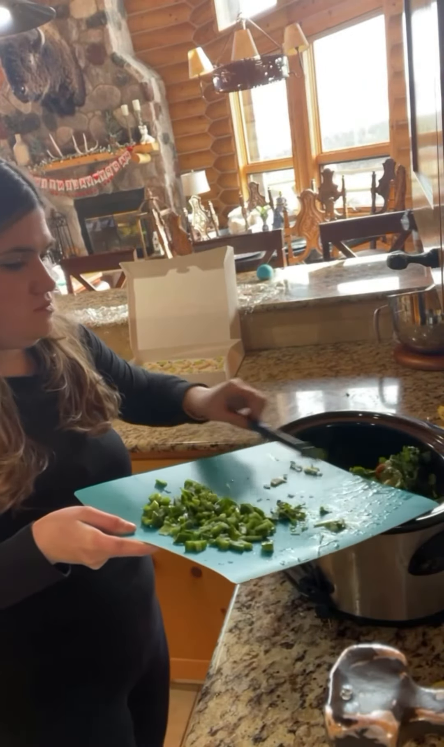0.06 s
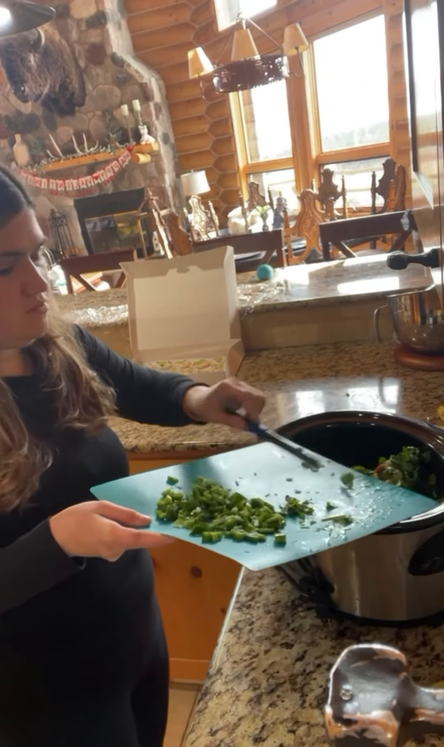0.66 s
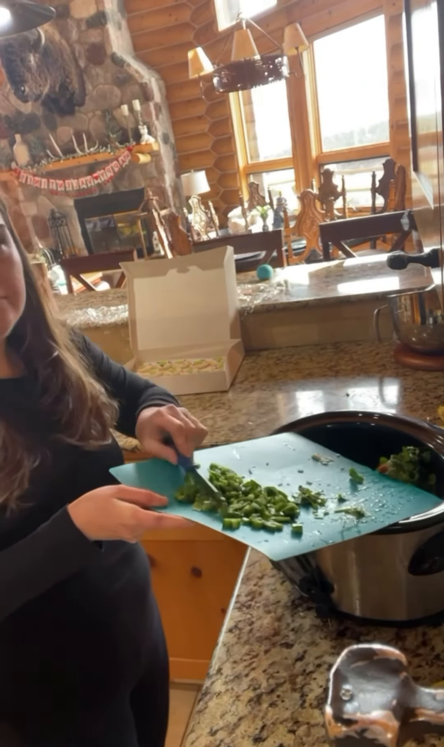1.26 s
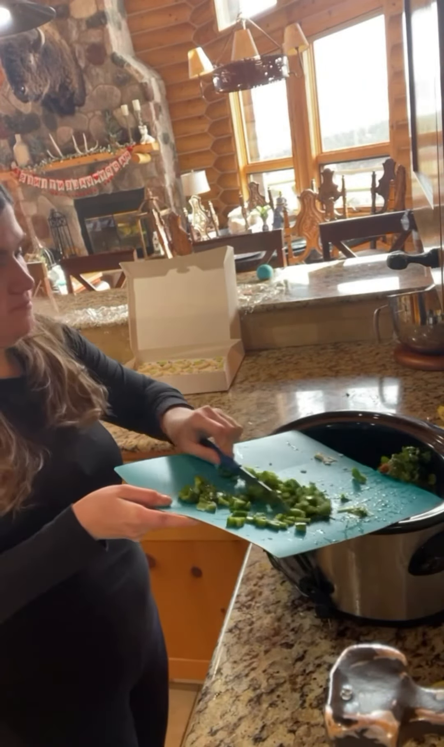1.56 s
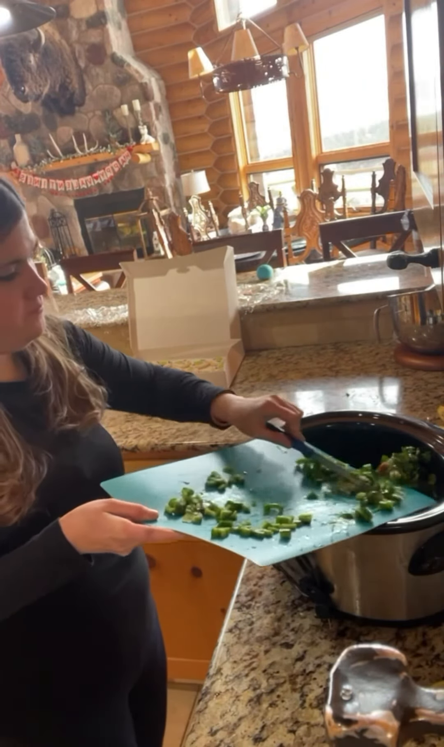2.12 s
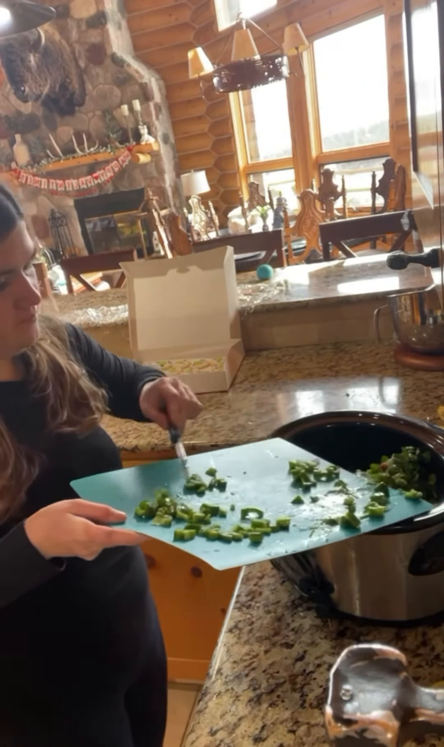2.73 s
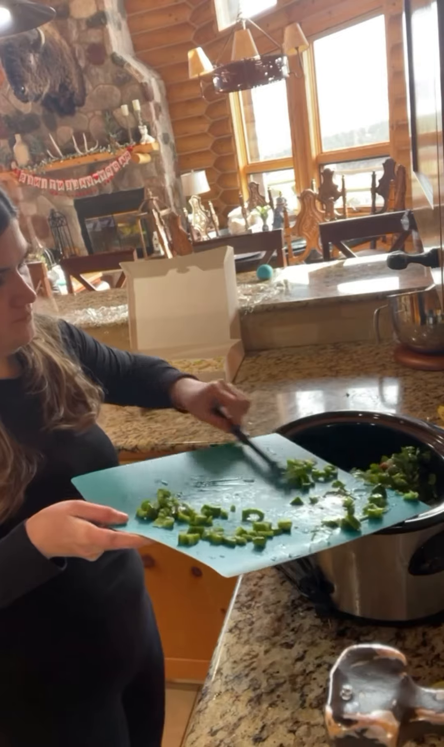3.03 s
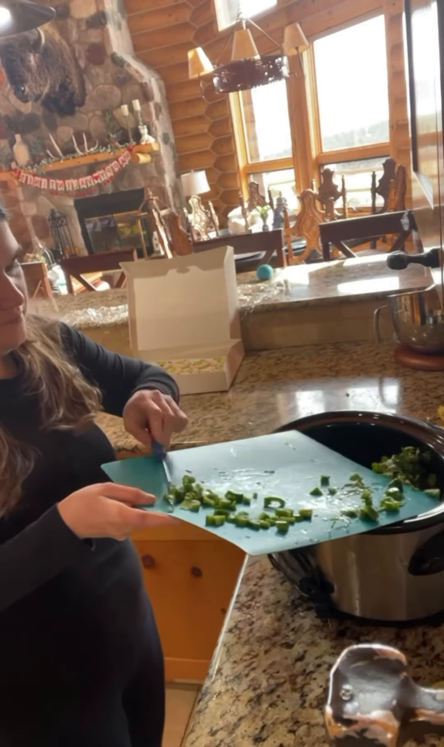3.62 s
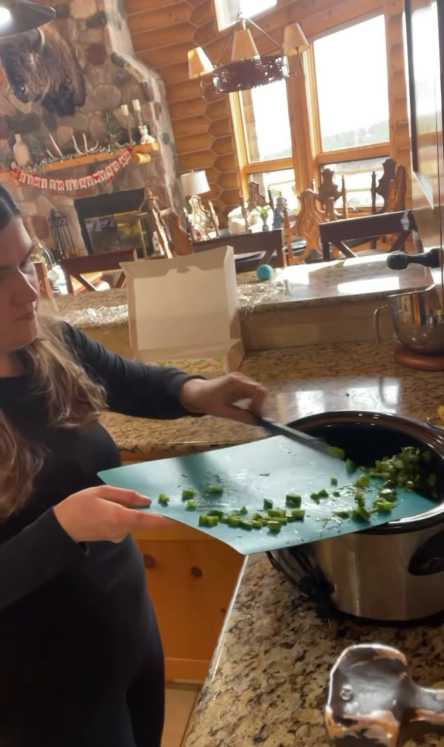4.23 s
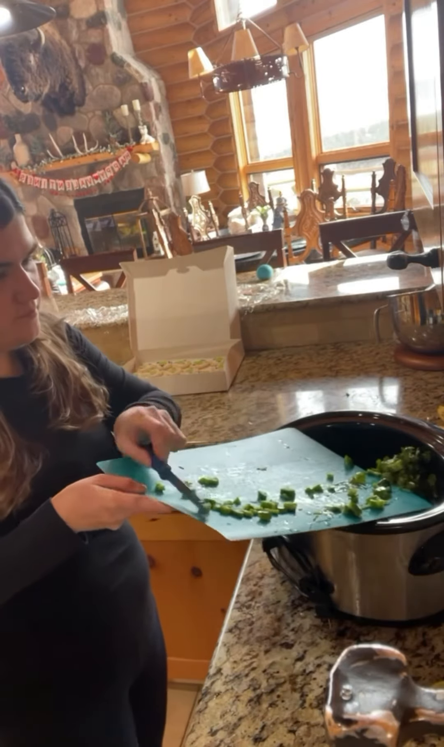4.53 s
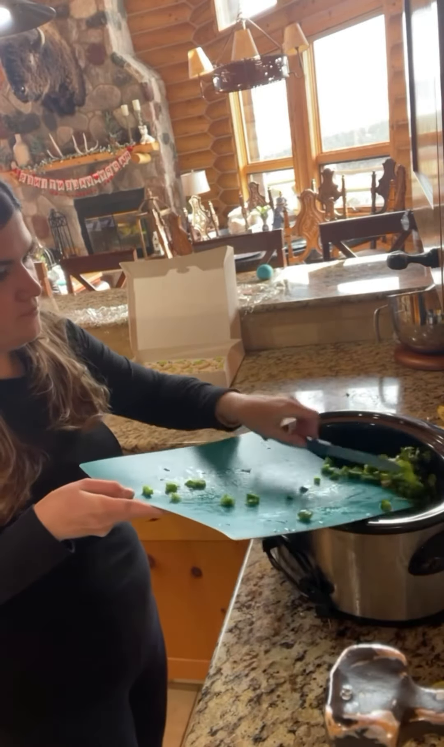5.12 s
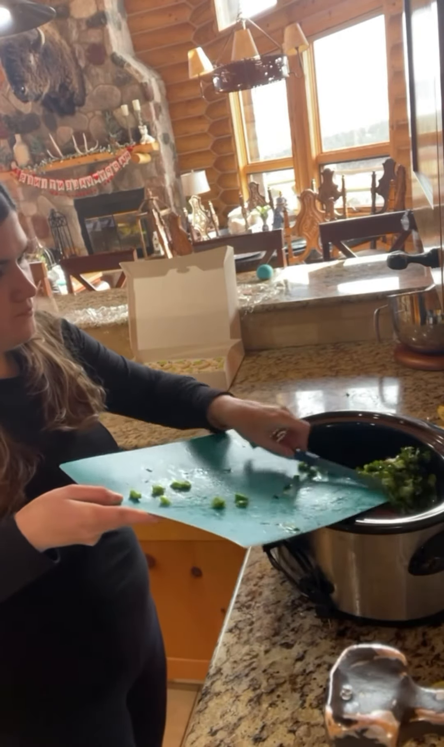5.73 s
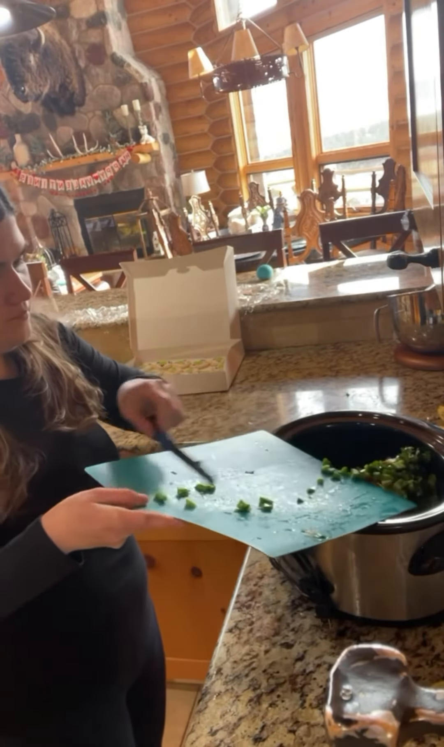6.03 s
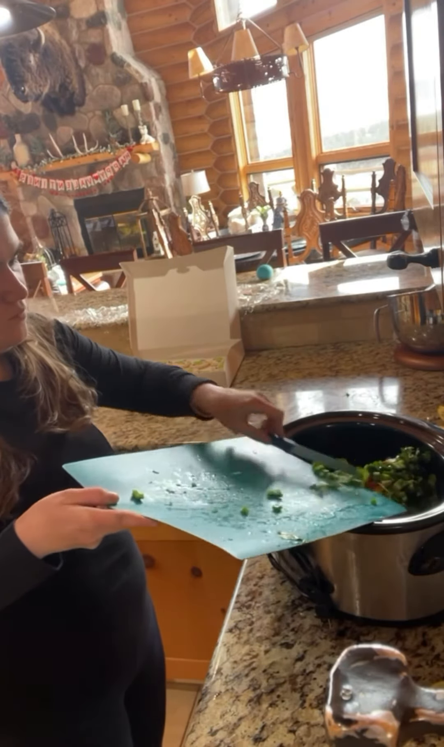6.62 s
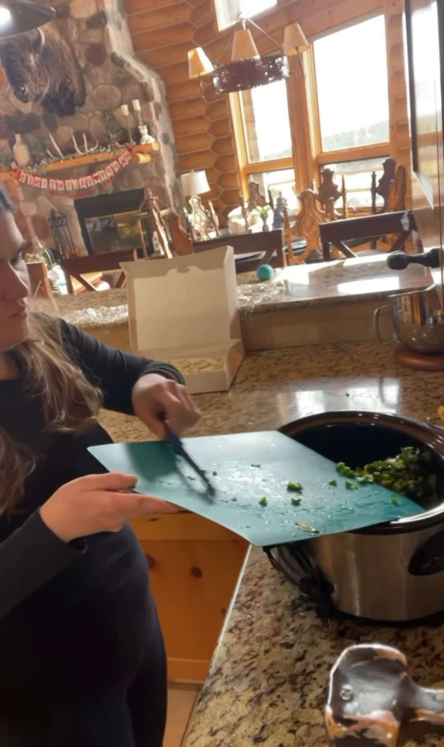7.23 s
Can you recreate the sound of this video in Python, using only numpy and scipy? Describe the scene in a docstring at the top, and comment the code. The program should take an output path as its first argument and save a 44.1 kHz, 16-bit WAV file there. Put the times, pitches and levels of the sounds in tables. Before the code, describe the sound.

A knife scrapes chopped greens off a thin plastic cutting board into a pot, close to the microphone in a large kitchen. After a tiny scrape at the start, the blade taps down at 0.3 seconds and rasps across the board with two short squeaks. Another tap at 1.2 seconds leads into a run of stuttering scrapes lasting until about 2.4. More taps, each followed by a hollow, rasping stroke, come at about 2.9, 3.7, 4.6, 5.5, 6.2 and 7.2 seconds. The edge snags and squeaks briefly along the way, most clearly around 3.1 and 6.4 seconds. The pot rings faintly as the blade nears it. Wet bits tick and clumps drop softly, around 0.5, 2.6, 5.2, 5.8 and 6.7 seconds. A quiet, low appliance hum and slight room echo continue throughout.

```python
"""A large kitchen, one microphone close to a crock pot, an appliance humming in the background.
A knife pushes chopped greens off a thin, hand-held plastic cutting board into the pot. The blade
taps down, then its edge sticks and slips over the plastic, rasping most at top speed, snagging on
scores and at moments locking into a squeak. The pot rings as the blade nears it, and wet bits
tick and drop."""
import sys
import numpy as np
from scipy import signal
from scipy.fft import rfft, irfft, next_fast_len
from scipy.io import wavfile
from scipy.ndimage import uniform_filter1d

SR = 44100
rng = np.random.default_rng(int(sys.argv[2]) if len(sys.argv) > 2 else 0)


def bounce(signal):
    """Save signal as a 16-bit WAV file at the path given by the first command-line argument."""
    frames = np.transpose(np.atleast_2d(signal))
    limited = np.clip(frames, -1, 1)
    pcm = np.round(limited * 32767).astype(np.int16)
    wavfile.write(sys.argv[1], SR, pcm)


N = 329377
TIME = np.arange(N) / SR


def amp(db):
    """Decibels as a gain."""
    return 10 ** (np.asarray(db) / 20)


def unit_rms(x):
    """x scaled to an rms of one."""
    return x / np.sqrt(np.mean(x ** 2) + 1e-20)


def steady(x):
    """x with its running level held at one."""
    return x / np.sqrt(abs(uniform_filter1d(x * x, size=2000)) + 1e-12)


def curve_at(points, hz):
    """The value at hz of points joined by straight lines over log frequency."""
    point_hz, value = np.transpose(points)
    return np.interp(np.log(hz + 1), np.log(point_hz + 1), value)


def add(mix, start_s, sound):
    """Mixes a sound in at start_s."""
    part = mix[max(round(start_s * SR), 0):][:len(sound)]
    part += sound[:len(part)]


def coloured(x, spectrum):
    """x filtered by a spectrum."""
    size = next_fast_len(len(x))
    gain = amp(curve_at(spectrum, np.fft.rfftfreq(size, 1 / SR)))
    return irfft(rfft(x, size) * gain, size)[:len(x)]


def lowpass(x, hz, order=3):
    """The part of x below hz."""
    return signal.sosfiltfilt(signal.butter(order, hz, fs=SR, output="sos"), x)


def wander(hz, size=N):
    """Smooth random motion with an rms of one, mostly slower than hz."""
    padded = next_fast_len(size)
    rolloff = np.exp(-(np.fft.rfftfreq(padded, 1 / SR) / hz) ** 2)
    return unit_rms(irfft(rfft(rng.standard_normal(size), padded) * rolloff, padded)[:size])


def click(spectrum, size=2048):
    """The sharpest causal pulse with this spectrum; it starts with a drop in pressure."""
    log_gain = np.log(amp(curve_at(spectrum, abs(np.fft.fftfreq(size, 1 / SR)))))
    minimum_phase = np.exp(np.conj(signal.hilbert(log_gain)))
    return -np.fft.ifft(minimum_phase).real[:size // 2]


def ring(x, modes):
    """Damped modes driven by x, each with its own gain at resonance."""
    t = TIME[:SR // 2]
    response = np.zeros(len(t))
    for hz, gain_db, t60_s in modes:
        decay = amp(gain_db - 60 * t / t60_s)
        response += decay * np.cos(2 * np.pi * hz * t) * 2 * np.log(1000) / (t60_s * SR)
    return signal.oaconvolve(x, response)[:len(x)]


# Room tone at the microphone: frequency_hz, relative_db
AIR_SPECTRUM = [(12, -68), (20, -7.5), (65, -10), (91, -23.5), (182, -26.5), (209, -22), (319, -25),
                (356, -18.5), (387, -31), (421, -18), (1480, -38), (6170, -51), (7510, -48.5),
                (16000, -56.5)]


def room_tone(level_db=-62):
    """The still air of the kitchen: faint noise, mostly rumble."""
    return amp(level_db) * unit_rms(coloured(rng.standard_normal(N), AIR_SPECTRUM))


# Tones of the appliance in the background: pitch_hz, level_db
HUM_TONES = [(58.6, -63.5), (177.6, -78), (355.3, -73.5), (8640, -99)]


def appliance_hum():
    """An appliance hums, its tones wavering together in pitch and level."""
    clock_s = np.cumsum(1 + 0.0022 * wander(7.6)) / SR
    hum = sum(amp(db) * np.sin(2 * np.pi * (hz * clock_s + rng.random())) for hz, db in HUM_TONES)
    return np.sqrt(2) * hum * (1 + 0.042 * wander(11))


# Decay of the kitchen: frequency_hz, t60_s
ROOM_DECAY = [(150, 0.91), (500, 0.48), (1500, 0.56), (5000, 0.4), (10000, 0.28), (16000, 0.11)]
# Colour of its reflections at the microphone: frequency_hz, gain_db
ROOM_SPECTRUM = [(100, 2.5), (400, -4.5), (800, 3.5), (1100, 1), (2500, -1), (5500, 4.5), (15000, 10)]


def kitchen(x, wet_db=-12, build_s=0.00053):
    """The close sound, then sparse reflections from a large timber room, each band dying at its pace."""
    slots = np.arange(SR // 300, SR - 20, 20)
    echoes = np.zeros(SR)
    echoes[slots + rng.integers(0, 20, len(slots))] = rng.choice([-1., 1.], len(slots))
    hz, t, bands = signal.stft(echoes, SR, nperseg=256)
    decay = amp(-60 * t / curve_at(ROOM_DECAY, hz)[:, None])
    tail = signal.istft(bands * decay * (1 - np.exp(-t / build_s)), SR, nperseg=256)[1]
    tail = coloured(tail / np.linalg.norm(tail), ROOM_SPECTRUM)
    return x + amp(wet_db) * signal.oaconvolve(x, tail)[:N]


def wet_contacts(events, spectrum, fade_s, gain_db):
    """Brief, rough contacts, each a short smear of tiny pulses."""
    out, t = np.zeros(N), TIME[:SR // 12]
    for start_s, level_db in events:
        pulses = rng.standard_normal(len(t)) * np.exp(-t / fade_s)
        smear = signal.fftconvolve(pulses, click(spectrum))
        add(out, start_s, amp(level_db + gain_db) * smear / abs(smear).max())
    return out


# Wet bits flicking, and clumps landing in the pot: start_s, relative_db
BIT_TICKS = [(0.8094, -60.5), (2.5577, -52.5), (2.6406, -50), (2.7591, -59), (4.4509, -46.5), (5.2298, -53)]
CLUMP_DROPS = [(.524, -54), (.704, -60), (.811, -58), (2.606, -50), (5.228, -53), (5.755, -52.5),
               (6.697, -46.5), (6.754, -57)]
# Colour of one tick and of one drop: frequency_hz, relative_db
TICK_SPECTRUM = [(200, -8), (1000, -2.5), (2500, -8.5), (7000, -15.5), (16000, -37)]
DROP_SPECTRUM = [(60, -19), (200, -6), (400, 0), (900, -6.5), (2000, -30), (8000, -42)]


def greens():
    """Wet bits tick as they flick away; clumps drop dully into the pot."""
    ticks = wet_contacts(BIT_TICKS, TICK_SPECTRUM, fade_s=0.01, gain_db=2.5)
    drops = wet_contacts(CLUMP_DROPS, DROP_SPECTRUM, fade_s=0.015, gain_db=9.5)
    return ticks + drops


# Modes of the crock pot: pitch_hz, gain_db, t60_s
POT_MODES = [(527.4, 14.5, 0.16), (673, 24.8, 0.087), (776, 4.6, 0.1), (864, 2.5, 0.18),
             (1458, 20.7, 0.031)]


def pot_ring(scrape, travel, gain_db=-13):
    """The pot rings just behind the scrape, louder as the blade nears it."""
    return amp(gain_db) * np.roll(ring(scrape * travel ** 2, POT_MODES), shift=SR // 400)


# Modes of the plastic board: pitch_hz, gain_db, t60_s
BOARD_MODES = [(267, -28, 0.18), (377.5, 8.5, 0.25), (507, -7, 0.18), (779, -2, 0.052), (895, 4, 0.058),
               (1422, 6.5, 0.024), (1960, -21, 0.066), (2520, -2.5, 0.0041), (2850, -23, 0.019)]


def board(force, modes_db, flutter_db, flutter_t60_s):
    """The sheet answers at once, then with its modes and bending waves that bounce between its edges."""
    t = TIME[:SR // 12]
    bounces = rng.standard_normal(len(t)) * amp(-60 * t / flutter_t60_s) * (t > .0005)
    highpass = signal.butter(2, 700, "high", fs=SR, output="sos")
    bounces = signal.sosfilt(highpass, bounces / np.linalg.norm(bounces))
    flutter = signal.oaconvolve(force, bounces)[:len(force)]
    return force + amp(modes_db) * ring(force, BOARD_MODES) + amp(flutter_db) * flutter


# The blade landing on the board: start_s, relative_db, thud_db, snap_db
BLADE_TAPS = [(0.2937, -20, -11, -19.5), (1.209, -21.5, -12, -15.5), (2.9117, -26, -9.5, -18.5),
              (3.7028, -20.5, -12, -17), (4.5744, -26.5, -15, -13.5), (5.5232, -30, -5, -33),
              (6.2245, -29, -12.5, -15.5), (6.2374, -31, -9.5, -20), (7.219, -26.5, -9.5, -15)]
# Colour of the blow, before thud and snap tilt it: frequency_hz, relative_db
TAP_SPECTRUM = [(60, -1), (170, 13.5), (350, 14.5), (560, 4), (850, -2), (2600, -6.5), (4000, -8),
                (8000, -11), (16000, -28)]


def taps(gain_db=1):
    """The blade lands: one sharp push on the sheet, duller when it falls flat."""
    out = np.zeros(N)
    for start_s, level_db, thud_db, snap_db in BLADE_TAPS:
        tilt = [(250, 2.3 * (thud_db + 6)), (700, 0.0098), (2000, 0.034), (6000, 2.4 * (snap_db + 11))]
        spectrum = [(hz, db + curve_at(tilt, hz)) for hz, db in TAP_SPECTRUM]
        push = np.pad(click(spectrum), (0, SR // 6))
        knock = board(push, modes_db=-2, flutter_db=2.5, flutter_t60_s=0.037)
        add(out, start_s, amp(level_db + gain_db) * knock / abs(push).max())
    return out


# The edge caught on a score in the plastic: start_s, length_s, relative_db
EDGE_SNAGS = [(1.3225, .003, -29.5), (1.3295, .024, -30), (1.356, .003, -39), (1.371, .008, -39),
              (1.515, .025, -33), (1.981, .02, -36), (3.741, .003, -40), (3.76, .012, -32),
              (4.012, .003, -25), (4.612, .003, -40), (4.631, 0.045, -37.5), (4.6728, .03, -29.5),
              (5.042, .055, -32.5)]
# Colour of one jerk: frequency_hz, relative_db
JERK_SPECTRUM = [(150, -14), (450, -2.5), (1400, 1), (2800, -10.5), (6000, -23), (10000, -27), (15000, -49)]


def snags(stutter_hz=333, uneven=0.29, spread_db=2):
    """The snagged edge stutters free in sharp, separate jerks, each knocking the sheet."""
    jerks, pulse = np.zeros(N), click(JERK_SPECTRUM)
    for start_s, length_s, level_db in EDGE_SNAGS:
        gap_scatter, size_scatter = rng.standard_normal((2, 20))
        gaps_s = np.exp(uneven * gap_scatter) / stutter_hz
        for delay_s, jerk_db in zip(np.cumsum(gaps_s) - gaps_s[0], spread_db * size_scatter):
            if delay_s < length_s:
                add(jerks, start_s + delay_s, amp([level_db + jerk_db]))
    force = signal.oaconvolve(jerks, pulse / abs(pulse).max())[:N]
    return board(force, modes_db=-1, flutter_db=-7.5, flutter_t60_s=.03)


# Slips locking to the flexing board, which favours one harmonic:
# start_s, length_s, start_hz, end_hz, level_db, favoured_harmonic, falloff_db (per step away from it)
EDGE_SQUEAKS = [ (0.344, 0.022, 564, 572, -34.5, 1.8, -23), (0.432, 0.033, 530, 560, -32.5, 0.86, -20),
                (2.604, 0.016, 710, 618, -45.5, 1.21, -31), (2.985, 0.026, 497, 512.5, -36.5, 2, -8),
                (3.068, 0.049, 1193, 852, -41.5, 0.98, -25), (3.076, 0.034, 467.3, 440, -37, 1.03, -22),
                (3.128, 0.024, 425.1, 430, -29, 2.8, -7), (3.229, 0.024, 720, 778, -32.5, 0.73, -25),
                (3.797, 0.055, 459.9, 348.7, -31, 0.94, -17), (4.148, 0.04, 546.3, 511.5, -33.5, 1.11, -25),
                (4.666, 0.03, 476.7, 477.7, -36.5, 3.07, -17), (5.655, 0.042, 235.4, 306, -39, 2.46, -6),
                (5.784, 0.03, 411.4, 344.4, -48.5, 1.01, -22), (6.321, 0.035, 404, 347, -37.5, 1, -11),
                (6.37, .023, 465, 492.8, -28.5, 2.46, -4.5), (6.402, .036, 471.8, 483.2, -28, 1.6, -15),
                (6.427, .02, 489.8, 505.2, -32, 1.18, -16), (6.662, 0.024, 861, 720, -35.5, 1.03, -25),
                (7.335, 0.072, 470.4, 469.6, -33.5, 2.9, -7), (7.436, 0.027, 553, 510.8, -52, 2.6, -4), ]


def squeaks(waver=0.023, shudder_db=2):
    """Short gliding runs of even slips: nearly pure when light, buzzing when the edge bites."""
    out, shake = np.zeros(N), wander(190, N + SR)
    for start_s, length_s, start_hz, end_hz, level_db, favoured, falloff_db in EDGE_SQUEAKS:
        size = int(length_s * SR)
        pitch_hz = np.linspace(start_hz, end_hz, size) * (1 + waver * shake[int(start_s * SR):][:size])
        phase = 2 * np.pi * np.cumsum(pitch_hz) / SR
        tone = -sum(amp(abs(k - favoured) * falloff_db) * np.cos(k * phase) for k in range(1, 9))
        add(out, start_s, amp(level_db) * unit_rms(tone) * signal.windows.tukey(size, .7))
    return out * amp(shudder_db * shake[::-1][:N])


def squeak_lock(ramp_s=.025):
    """How far the slips have fallen into step with a squeak, 0-1."""
    locks = [np.interp(TIME, [start - ramp_s, start, start + length, start + length + ramp_s],
                       [0, 1, 1, 0]) for start, length, *_ in EDGE_SQUEAKS]
    return np.max(locks, axis=0)


# Pushes of the blade toward the pot; boom, rasp, hiss and flex are relative to the pressure:
# start_s, speeding_s, length_s, reach (0-1), pressure_db (at top speed), swell_db (before it),
# sag_db (after it), boom_db, rasp_db, hiss_db, keen_db, flex1_db, flex2_db, uneven (0-1)
BLADE_PUSHES = [ (0.0, 0.0028, 0.052, 0.98, -36, -27, 7, -14, -0.5, -24, 3.5, -2, -4.5, 0.47),
                (0.297, 0.078, 0.18, 0.56, -34.5, 16, 8.5, -10.5, 5.5, -23.5, -4, -35, -2, 0.56),
                (0.409, 0.11, 0.13, 0.98, -42.5, -23, 1, -8.5, 1, -20, 2, -7, 1, 0.48),
                (1.324, 0.012, 0.15, 0.1, -43.5, -15.5, 2.5, -9.5, 1, -22, 0.5, 4, -18, 0.58),
                (1.51, 0.083, 0.18, 0.21, -44.5, 7.5, 0, -3.5, 6, -24, -3, -11, -19, 0.7),
                (1.655, 0.08, 0.15, 0.32, -49, -3.5, -4, 4.5, 5, -23.5, 0.5, 8.5, -22, 0.5),
                (1.764, 0.088, .26, 0.77, -37, -2, 4, -6.5, 1, -27.5, -3.5, -4, -26, 0.6),
                (1.98, 0.035, 0.41, 0.99, -44, -18, 4.5, 1, -0.5, -25.5, -4, -0.5, -42, 0.66),
                (2.929, 0.14, 0.29, 0.63, -38.5, 9, 2.5, -8.5, 10, -14.5, -2, -15, -6, .38),
                (3.14, 0.12, .16, 0.94, -41.5, -5, -1, -0.5, 5, -14, 1, -16, 6.5, .38),
                (3.738, 0.11, 0.24, .3, -35, 6.5, 7.5, -5, 2, -24, -2, -1, -20, 0.54),
                (3.919, 0.097, 0.31, 0.61, -37, -8, 5.5, -11.5, 6.5, -17.5, 0.5, 3, -30, .44),
                (4.62, 0.11, .41, 0.622, -40, 15, 0.5, -8, 5.5, -15.5, 2.5, -13, -9, 0.71),
                (4.97, 0.11, .19, 0.77, -42, -3.5, 1.5, -10.5, 4, -21, 0.5, -3, -26, .75),
                (5.553, 0.077, 0.11, 0.41, -51.5, 1, -6, -10, 8.5, -12.5, 1, -20, 2, 0.64),
                (5.604, 0.05, 0.1, 0.49, -41.5, 0, -1, -5, 0, -18.5, -3, -25, 6, 0.61),
                (5.675, 0.03, 0.08, 0.57, -51, -3, 4, -8, 12, -6, 2.5, -18, -12, .6),
                (6.313, 0.14, 0.37, 0.92, -37.5, 8.5, 0.5, -6.5, 7.5, -15, -2, -1.5, -6, 0.32),
                (7.225, 0.016, 0.11, 0.21, -50, -3, -3, 3, 8.5, -15, -1, 7, -5, .45),
                (7.295, 0.055, 0.26, 0.78, -36, -11, -9, -6.5, 5.5, -20, -6, -17, 1, 0.36), ]


def blade_path(attack_s=0.0033, release_s=0.035):
    """Each push speeds up, then slows; overlapping pushes blend into one stroke's control curves."""
    contact, path = np.zeros(N), np.zeros((9, N))
    last_end_s, last_reach = 0, 0
    for (start_s, speeding_s, length_s, reach, pressure_db, swell_db, sag_db,
         boom_db, rasp_db, hiss_db, keen_db, flex1_db, flex2_db, uneven) in BLADE_PUSHES:
        fastest_s, end_s = start_s + speeding_s, start_s + length_s
        runs_on = start_s < last_end_s
        now = (TIME > start_s) & (TIME < end_s)
        t = TIME[now]
        touch = np.minimum((t - start_s) / (release_s if runs_on else attack_s), 1)
        touch *= np.minimum((end_s - t) / release_s, 1)
        travel = np.interp(t, [start_s, end_s], [last_reach * runs_on, reach])  # 1 at the pot
        early = np.interp(t, [start_s, fastest_s], [1, 0]) ** 1.9
        late = np.interp(t, [fastest_s, end_s], [0, 1]) ** 1.3
        slow = early + late
        contact[now] += touch
        path[:, now] += touch * np.array([
            travel,
            pressure_db - swell_db * early - sag_db * late,
            boom_db - 1.5 * slow,
            rasp_db - 4.5 * slow,
            hiss_db - 6 * slow + 0.5 * (travel - .5),  # wet greens gather ahead of the blade
            keen_db + 13 * (travel - .5),  # the sheet stiffens toward the pot
            np.full(len(t), flex1_db), np.full(len(t), flex2_db),
            uneven + .12 * slow])  # a slow blade slips less evenly
        last_end_s, last_reach = end_s, reach
    touching = contact > 0
    curves = [np.interp(TIME, TIME[touching], curve[touching] / contact[touching]) for curve in path]
    return np.minimum(contact, 1), *curves


def stick_slip(hz, uneven, jitter=.75, size_spread=0.18, grit_db=-7, crossover_hz=3200, crackle_db=5):
    """One blunt pulse a slip, uneven in time and size; grit and fine scratches surge with each."""
    turns = np.cumsum(hz * np.maximum(1 + jitter * uneven * wander(300), 0)) / SR
    sizes = np.exp(size_spread * uneven * np.clip(rng.standard_normal(N), -2, 2))
    slips = unit_rms(np.diff(np.floor(turns), prepend=0) * sizes / np.sqrt(hz))
    grit = unit_rms(rng.standard_normal(N) * (.5 + np.exp(-(turns % 1) / 0.47)))
    # some slips crack, others smear
    sharpness = amp(crackle_db * np.clip(rng.standard_normal(N), -2, 2))[turns.astype(int)]
    fizz = unit_rms(rng.standard_normal(N) * (.5 + sharpness * np.exp(-(turns % 1) / 0.21)))
    force = lowpass(slips - fizz, crossover_hz, order=2) + fizz  # slips below, fizz above
    force += amp(grit_db) * grit
    return force - uniform_filter1d(force, size=600)  # the steady push makes no sound


def rim_echoes(x, travel, shortest_s=0.0009016, longest_s=.006, stretch=0.451, count=7):
    """Waves return from the rim, latest with the blade at mid-board: their ripple glides down, then up."""
    out = np.zeros(N)
    for path_s in np.geomspace(shortest_s, longest_s, count):
        sway = 0.144 * np.sin(2 * np.pi * (rng.uniform(.4, .9) * TIME + rng.random()))
        delay_s = path_s * (1 + stretch * np.sin(np.pi * travel) + sway)
        out -= np.interp(TIME - delay_s, TIME, x) * rng.choice([-1, 1])
    return out / np.sqrt(count)


def flex(x, hz, width_hz=135):
    """A gliding resonance of the bent sheet, held at a level of one."""
    carrier = np.exp(2j * np.pi * np.cumsum(hz) / SR)
    pole = np.exp(-np.pi * width_hz / SR)
    for _ in range(2):  # twice, for steep sides
        x = 2 * (carrier * signal.lfilter([1 - pole], [1, -pole], x / carrier)).real
    return steady(x)


def glinting(x, depth_db=3):
    """Brief, narrow glints come and go all over the treble."""
    bands = signal.stft(x, nperseg=512, noverlap=384)[2]
    patches = uniform_filter1d(rng.standard_normal(bands.shape), size=4, axis=0)
    patches = unit_rms(uniform_filter1d(patches, size=4, axis=1))
    return signal.istft(bands * unit_rms(amp(depth_db * patches)), nperseg=512, noverlap=384)[1][:N]


# Colour of one slip of the edge, heard close: frequency_hz, relative_db
SLIP_SPECTRUM = [(60, -59), (115, -10.5), (165, -0.5), (235, 4.5), (370, -3), (520, 1.5), (850, -2),
                 (1100, -4), (1500, -5), (2000, -6), (2900, -8), (3700, -11), (6400, -15.5), (9000, -20),
                 (16000, -33.5)]
# Pitch of the flexing sheet under the edge, which also paces the slips: time_s, pitch_hz
SHEET_PITCH = [ (0, 723), (.04, 743), (.3, 449.2), (.37, 354.4), (.42, 446.8), (.46, 438.3), (.51, 465.5),
               (1.33, 456.8), (1.41, 367.6), (1.6, 519.8), (1.72, 477.4), (1.81, 381.7), (1.99, 522),
               (2.36, 528.4), (2.94, 368.6), (3.0, 440.4), (3.07, 528.6), (3.115, 382.2), (3.145, 424.5),
               (3.18, 385.9), (3.23, 452.3), (3.28, 449.6), (3.75, 330.5), (3.8, 451.6), (3.85, 380.9),
               (3.95, 508.3), (3.98, 761.2), (4.02, 820.3), (4.11, 736), (4.2, 685.3), (4.64, 345.8),
               (4.69, 471.4), (4.74, 361.8), (4.82, 399.2), (4.89, 505.2), (4.97, 354.7), (5.08, 440),
               (5.15, 369.3), (5.57, 442.5), (5.62, 395), (5.74, 389), (6.32, 408.7), (6.35, 341.9),
               (6.39, 484.8), (6.43, 475.6), (6.465, 542.6), (6.51, 448.6), (6.555, 479.2), (6.58, 518.3),
               (6.63, 611.7), (6.69, 728.6), (7.23, 329.5), (7.31, 400.5), (7.36, 446), (7.47, 472.5), ]
# Modes of the knife, which colour the rasp: pitch_hz, gain_db, t60_s
KNIFE_MODES = [(2370, -16, 0.036), (2880, -5, 0.032), (3420, -11, 0.04), (5330, -23, 0.03),
               (6500, -7, 0.0177)]


def scrapes(locked_uneven=.2, free_db=5, propped_db=-4):
    """Friction drives the board and its gliding flex resonances; a harder bite adds rasp and hiss."""
    (contact, travel, pressure_db, boom_db, rasp_db, hiss_db,
     keen_db, flex1_db, flex2_db, uneven) = blade_path()
    flex_hz = np.interp(TIME, *np.transpose(SHEET_PITCH))
    lock = squeak_lock()
    uneven = np.clip(uneven + lock * (locked_uneven - uneven), .02, 1)
    direct = signal.oaconvolve(stick_slip(flex_hz, uneven), click(SLIP_SPECTRUM))[:N]
    sound = direct + amp(-3) * rim_echoes(direct, travel)
    sound += amp(-8) * ring(direct, BOARD_MODES) + ring(direct, KNIFE_MODES)
    bass, below_rasp = lowpass(sound, 430), lowpass(sound, 1100)
    below_keen, below_hiss = lowpass(sound, 3300, order=5), lowpass(sound, 6500, order=5)

    # the free sheet booms; where it rests on the pot it is stiff and thin
    support_db = free_db + (propped_db - free_db) * travel
    boom = amp(boom_db + support_db - 3) * steady(bass - 0.69 * lowpass(sound, 261))
    body = amp(-3.5) * steady(below_rasp - bass)
    hollow = amp(flex1_db) * flex(direct, flex_hz) + amp(flex2_db) * flex(direct, 2 * flex_hz)
    rub = (boom + body + amp(-7) * hollow) * amp(-3 * lock)  # a squeak takes its energy from the rub

    upper_rasp = amp(keen_db) * (below_hiss - below_keen)
    rasp = amp(rasp_db - 4.5) * steady(below_keen - below_rasp + upper_rasp)
    flicker_db = 0.89 * wander(104)  # wet crumbs
    hiss = amp(hiss_db + 0.5 + flicker_db) * steady(sound - below_hiss)
    catch_db = .9 * wander(30)  # the edge catches on scratches
    scrape = (rub + glinting(rasp + hiss)) * contact * amp(pressure_db + catch_db)
    return scrape + pot_ring(scrape, travel)


def scene():
    """Greens, knife and board close to the microphone, the kitchen behind them, in mono."""
    close = greens() + scrapes() + squeaks() + taps() + snags()
    return (kitchen(close) + room_tone() + appliance_hum())[None]


def record(dry):
    """The recorder cuts off the highest treble."""
    band_limit = signal.firwin(511, cutoff=15800, window=("kaiser", 9), fs=SR)
    return signal.oaconvolve(dry, band_limit[None], "same")


dry = scene()
out = record(dry)
bounce(out)
```